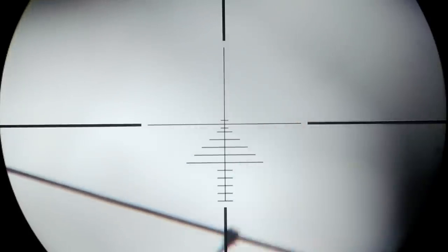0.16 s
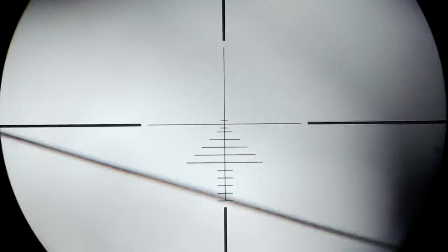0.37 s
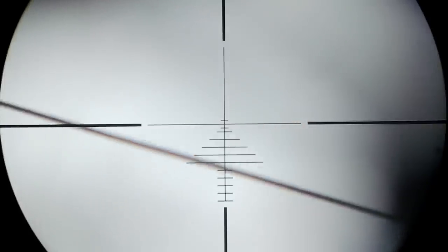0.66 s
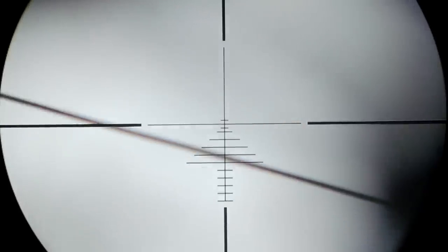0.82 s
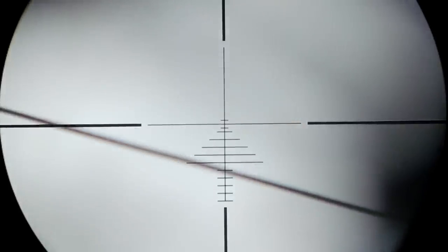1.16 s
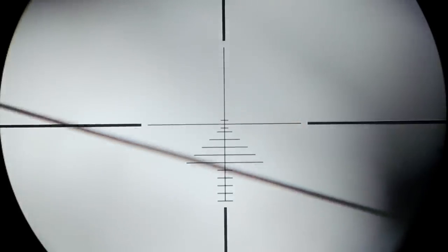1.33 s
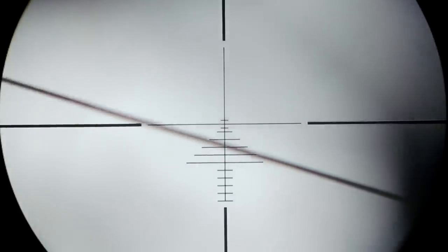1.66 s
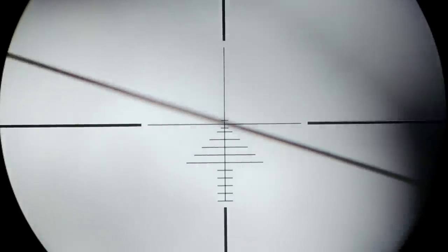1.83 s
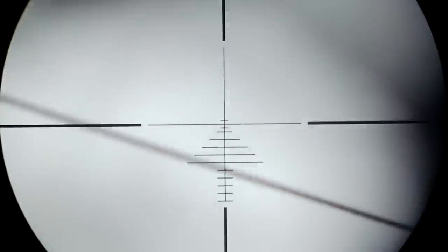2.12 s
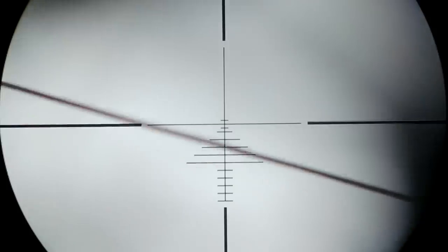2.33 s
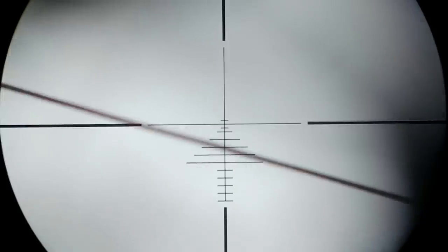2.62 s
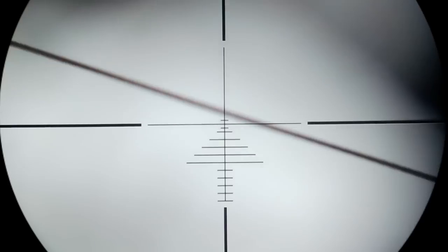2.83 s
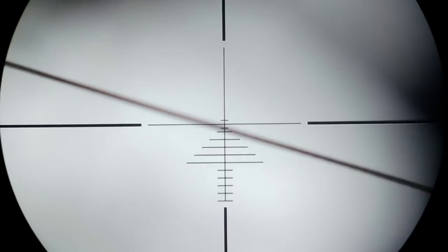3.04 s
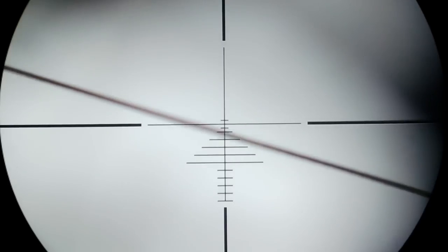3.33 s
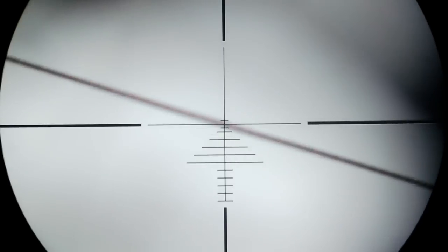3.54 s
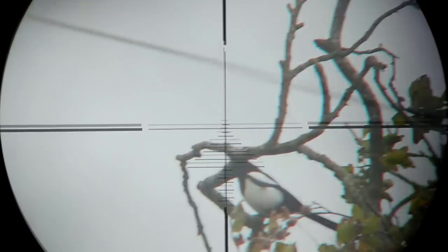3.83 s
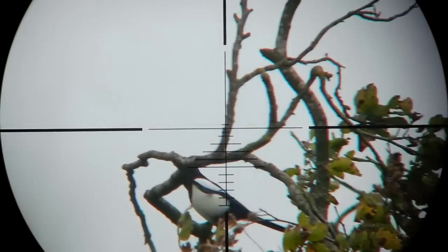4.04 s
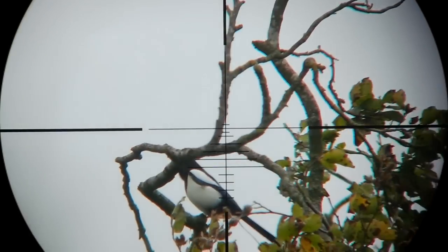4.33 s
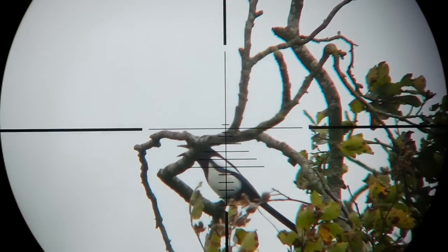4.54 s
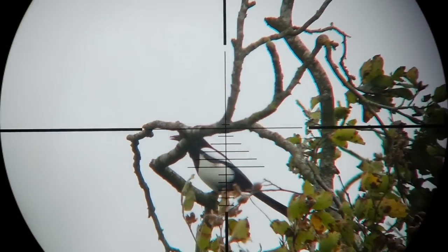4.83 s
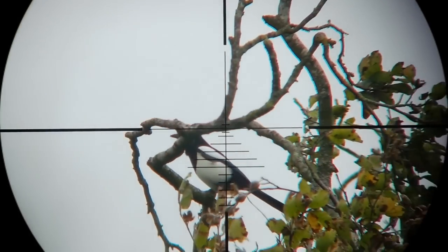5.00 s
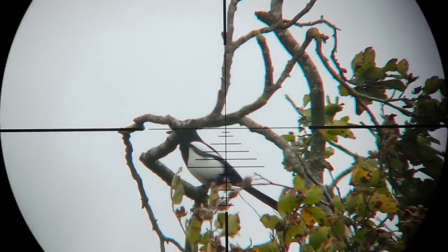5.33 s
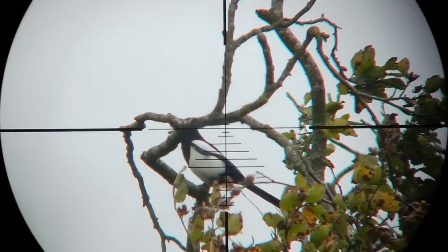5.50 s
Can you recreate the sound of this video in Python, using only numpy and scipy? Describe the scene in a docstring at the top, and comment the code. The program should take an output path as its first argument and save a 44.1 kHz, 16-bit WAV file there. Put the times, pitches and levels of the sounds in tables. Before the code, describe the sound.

An air rifle is handled right by the microphone in the open air. After a few soft ticks, the steel lever opens with a rapid cluster of sharp clacks, then shuts with another cluster ending in a hard snap, followed by one softer click. A low engine drone and faint traffic continue in the distance, and near the end come a very quiet magpie chatter and a few thin chirps.

```python
"""A side-lever air rifle is cocked outdoors, close to the microphone, while an engine drones far off.
At first the microphone is settling from a jolt and the barrel rings. Light touches slide on the steel
as traffic hiss swells and begins to fade. Near 2 s and 3 s the lever works in two bursts of clacks,
with a lighter one at 3.5 s: impact and friction excite the modes of steel, pins, barrel and hollow
stock. From about 4 s small birds chirp faintly and a magpie chatters in harsh throat pulses."""
import sys
import numpy as np
from scipy import signal
from scipy.fft import rfft, irfft
from scipy.io import wavfile

SR = 44100
rng = np.random.default_rng(int(sys.argv[2]) if len(sys.argv) > 2 else 0)


def output_pcm(signal):
    """Save a mono or channel-first signal as 16-bit PCM at the path in sys.argv[1].

    Samples are clipped to [-1, 1] before scaling.
    """
    pcm = np.clip(np.atleast_2d(signal).T, -1, 1) * 32767
    wavfile.write(sys.argv[1], SR, np.round(pcm).astype(np.int16))


N = 249606

# Impacts in the action. Each row: start in seconds, peaks of steel, stock and pins in dB, chatter time
# in ms, tilts of steel and stock in dB per octave. The tilts express where on the part the blow lands.
IMPACTS = [(0.203, -38.5, -44.5, -56, 2, 23, -5), (0.957, -51, -52, -60, 4.6, -4, -10),
           (1.126, -57.5, -54, -63, 3.9, -7, -1), (1.2656, -59, -68, -70, 5, -5.0, -3.0),
           (1.718, -73, -51, -75, 4, -13, 16), (1.8725, -73.5, -38, -72, 13, -2, -11.5),
           (1.9877, -40.5, -47.0, -43, 3, 1.5, -3.5), (2.0009, -19.5, -37, -27, 2.4, -1, 5),
           (2.0123, 6, -3, -9.5, 3.32, 2.5, 2.5), (2.0474, -22, -31, -42, 0.63, 1.5, -5.5),
           (2.0625, -8.5, -32.5, -37, 0.9, -2.5, 14), (2.0712, -11.5, -34.5, -36.5, 0.97, -1.5, -4),
           (2.0805, -16.5, -21.5, -29, 4.4, -1, -1), (2.088, -24.5, -24, -35.5, 5.6, -10, -3.5),
           (2.1078, -17, -19, -48, 6.6, -9.5, 0.5), (2.1191, -13, -44, -40, 3.2, 11.5, 4),
           (2.1327, -20, -36.5, -35, 7.9, 1, -1.5), (2.156, -0.5, -21, -14.5, 2.9, 6.5, -2.5),
           (2.1631, -6, -11, -8, 2.05, -3, 0.5), (2.1735, -17, -15.5, -17, 2.8, -3.5, 2.5),
           (2.199, -46, -23, -48, 8.6, -2.5, 0.5), (2.2338, -6.5, -18, -10, 4.9, -2, 6.5),
           (2.2532, -30, -33.5, -33, 3.0, 16, -1), (2.3058, -50.5, -36, -69, 4.4, -23, -13),
           (2.7742, -26, -41.5, -38, 2.7, 4, -9), (2.7815, -22.5, -32.5, -49.5, 0.65, 5, 1),
           (2.7891, -11.5, -22, -23.5, 2.3, -3.5, 5), (2.8246, -38, -38, -48.5, 1.1, 5, -3),
           (2.8336, -38.5, -33.5, -55, 4.3, -8, -5), (2.8429, -23, -17, -41.5, 6.2, -0.5, -1),
           (2.851, -0.5, -12.5, -13, 2.37, 6, -5), (2.8576, -6, -18.5, -16, 2.2, 12.5, 2.0),
           (2.8671, -8.5, -9, -22, 1.9, 6, 0.5), (2.8845, -6, -22.5, -21.5, 1.8, 0, 6.5),
           (2.895, -12, -20, -18, 3.1, 0.5, -4.5), (2.9, -3.5, -8.5, -16.5, 3.9, 6.5, 3.5),
           (2.914, -15, -20.5, -30.0, 1.6, 7, 0), (2.9335, -4, -20, -16, 1.7, 14.5, -2),
           (2.9467, -9, -9.5, -28, 2.4, 9.5, -1.5), (2.9531, -11, -15.5, -14.5, 0.8, 8.5, 1),
           (2.9675, 10.5, 0, -6, 3.6, 10.5, -2), (3.4372, -17.5, -27.5, -30.0, 3.1, 2, 11),
           (3.4439, -23, -24.5, -32, 3.4, -1, -1.5), (3.4923, -19, -31, -43, 0.92, -1, -11.5),
           (3.496, -12.0, -16, -39, 3.14, -6, 3.5), (3.6346, -74, -43.5, -76, 5.5, 4.0, -7.5),
           (3.6894, -53, -76, -69, 8.1, -5, -7.0), (3.9738, -59, -49, -63, 5.2, -8, -7),
           (4.2729, -60, -47, -59, 3.7, -10, -11)]
# Modes of the steel action. Each row: frequency in Hz, relative level in dB, t60 in seconds.
STEEL_MODES = [(2130, -12, 0.0072), (2956, -16, 0.0098), (3400, -9, 0.007), (3730, -10, 0.0058),
               (4150, -13, 0.0049), (4780, -11.5, 0.0091), (5050, -5, 0.0052), (5542, -3.5, 0.0084),
               (6220, -9, 0.0077), (6340, -7.5, 0.0055), (6880, -8, 0.0034)]
# Modes of the hollow stock. Each row: frequency in Hz, relative level in dB, t60 in seconds.
STOCK_MODES = [(145, -20, 0.026), (242, -21, 0.04), (531, -11.5, .04), (636, -9.5, .02), (878, -1.5, 0.04),
               (1020, -7, 0.022), (1094, -5.5, 0.022), (1686, -7, 0.012)]
# Treble modes of the small parts. Each row: frequency in Hz, relative level in dB, t60 in seconds.
PIN_MODES = [(7670, -4, 0.011), (8530, -2, 0.009), (9430, -2.5, 0.0039), (10800, -4.5, 0.0048),
             (11700, -7.5, 0.0011), (13100, -11.5, .005), (14895, -13.5, .005)]
# Long ring of barrel and air tube. Each row: frequency in Hz, relative level in dB, t60 in seconds.
BARREL_MODES = [(1058, -13, .4), (1765, -18, .12), (2290, -17, .15), (2562, -21, .11), (2920, -16, .12),
                (3316, -12, .12), (3456, -9, .1), (3615, -10, .14), (3781, -7, .15), (3909, -10, .09),
                (4340, -12, .12), (4793, -8, .08), (5023, -6, .3), (5060, -5, .1), (5193, -8, .1),
                (5360, -8, .14), (5426, -3, .1), (5490, -18, .55), (5510, -3, .1), (5704, -9, .1),
                (6355, -22, .25), (6605, -25, .1), (7290, -24, .15), (7845, -24, .25), (8600, -26, .18),
                (9550, -30, .25), (10400, -36, .25)]
# Lever and hand rubbing, and a brief hiss around the clack at 2.23 s.
# Each row: start and length in seconds, levels of steel, stock and pins in dB.
RUBS_AND_HISS = [(0.195, 0.025, -71, -63, -70), (1.7, 0.05, -75, -67, -85), (2.04, 0.02, -46, -42, -58),
                 (2.07, 0.08, -37.5, -42, -48.5), (2.14, 0.032, -42.5, -37.5, -43),
                 (2.19, 0.028, -43.5, -42, -57.5), (2.22, 0.039, -43.5, -44.5, -46),
                 (2.29, 0.045, -71, -48, -86), (2.81, 0.03, -57.5, -55.5, -64.5),
                 (2.855, 0.06, -34.5, -27.5, -43), (2.925, 0.035, -43.5, -31.5, -48),
                 (2.975, 0.018, -42.5, -40, -43.5), (3.465, 0.025, -52, -53.5, -58),
                 (3.64, 0.04, -71.5, -59.5, -95), (3.69, 0.09, -75, -78, -80)]
# Rattle of steel, stock and pins, in that order. Each row: level offset in dB, t60 in seconds.
RATTLE_DECAYS = [(-34, 0.089), (-23.5, 0.078), (-30, .055)]
# Light sliding touches on the steel. Each row: start in seconds, length in seconds, level in dB.
STEEL_TOUCHES = [(0.1, 0.055, -63), (0.195, 0.012, -51.5), (1.31, 0.14, -78), (3.61, 0.039, -76),
                 (3.66, 0.14, -77)]
# Level of the low drone as heard, dipping briefly near 3.9 s where the background drops.
# Each row: time in seconds, level in dB.
DRONE_LEVELS = [(0, -44.5), (3.6, -45.5), (3.9, -50), (4.1, -47.5), (5.66, -46)]
# Partials of the engine. Each row: multiple of the firing rate, relative level in dB.
ENGINE_ORDERS = [(.5, -3), (1, 1.5), (1.5, -20)]
# Traffic hiss as heard. Each row: time in seconds, level in dB, gain of the added treble in dB.
TRAFFIC_COURSE = [(0, -61.5, -40), (.4, -61, -11), (.8, -58.5, -12), (1.1, -61, -2.5), (1.45, -59.5, 5),
                  (1.9, -62, -2.5), (2.6, -63.5, -9), (3.6, -66, -12), (3.85, -70, -13), (5.66, -71, -23)]
# Spectrum of tyre roar. Each row: frequency in Hz, relative spectral density in dB.
TYRE_SPECTRUM = [(180, -46.5), (300, -26), (406, 4), (533, -4), (587, 2.5), (722, -4), (770, -1),
                 (1140, -3), (1320, -12), (1460, -5.5), (1630, -11.5), (2350, -22.5), (4000, -41.5),
                 (5200, -60.5), (8800, -120)]
# Notes of the magpie. Each row: start in seconds, level in dB.
MAGPIE_NOTES = [(4.105, -71), (4.15, -63.5), (4.213, -66), (4.286, -64.5), (4.366, -66), (4.441, -65.5),
                (4.524, -64), (4.611, -61), (4.71, -62.5)]
# Resonances of its voice. Each row: frequency in Hz, nominal bandwidth in Hz, relative level in dB.
MAGPIE_FORMANTS = [(1847, 150, 2.5), (2424, 610, 5), (2768, 490, 5), (4940, 770, 1), (5970, 580, -5)]
# Chirps of far birds. Each row: start in seconds, level in dB, length in seconds.
BIRD_CHIRPS = [(3.958, -77, .17), (4.82, -77.5, .13), (5.415, -77.5, .18)]
# Spectrum of the open air. Each row: frequency in Hz, relative spectral density in dB.
AIR_SPECTRUM = [(12, -30.5), (20, -8.5), (34, -15), (55, -15.5), (106, -20), (140, -36.5), (180, -37),
                (416, -41.5), (505, -49), (811, -48), (1380, -57.5), (4000, -63), (8400, -66.5),
                (11500, -71), (15300, -70), (16200, -89)]


def rifle():
    """Superposition: steel, pins, stock and barrel answer the same impacts and rubbing."""
    starts, steel_db, stock_db, pins_db, _, steel_tilt, stock_tilt = np.transpose(IMPACTS)
    rattles = [rattle(starts, db, *decay)
               for db, decay in zip((steel_db, stock_db, pins_db), RATTLE_DECAYS)]
    steel_rub, stock_rub, pins_rub = swells(RUBS_AND_HISS, rise_s=0.004, fade_s=0.0065) + rattles
    touch, = swells(STEEL_TOUCHES, rise_s=0.018, fade_s=0.012)
    steel = struck_part(STEEL_MODES, [1800, 7500], steel_db, steel_rub, steel_tilt,
                        spread_db=3.5, rise_ms=0.27, impulse_db=12)
    pins = struck_part(PIN_MODES, [7000, 16500], pins_db, pins_rub, np.zeros(len(starts)),
                       spread_db=1.5, rise_ms=0.22, impulse_db=6)
    stock = struck_part(STOCK_MODES, [90, 2200], stock_db, stock_rub, stock_tilt,
                        spread_db=4, rise_ms=1.5, impulse_db=12.5)
    return steel + pins + stock + barrel(starts, steel_db, steel_rub, touch) + sliding_touch(touch)


def struck_part(modes, band_hz, peak_db, rub_gain, tilt_db, spread_db, rise_ms, impulse_db):
    """Modal excitation: each impact is an impulse with a short chatter; friction drives the modes too."""
    impacts, t = np.array(IMPACTS), np.arange(SR // 12) / SR
    chatter_s = np.clip(impacts[:, 4:5], 0.2, 9) / 1000
    envelope = np.exp(-(t / chatter_s) ** 1.2) * (1 - np.exp(-1000 * t / rise_ms))
    force = envelope * rng.standard_normal((len(impacts), len(t)))
    force[:, round(rise_ms * SR / 1000)] += amp(impulse_db)
    octaves = np.log2(np.minimum(np.array(modes)[:, 0], 5000) / band_hz[0])   # tilt ends at 5 kHz
    scatter_db = spread_db * rng.standard_normal((len(impacts), len(modes)))
    strengths = amp(scatter_db + np.outer(tilt_db, octaves))
    radiation = signal.butter(2, band_hz, "band", fs=SR, output="sos")   # little radiates outside it
    blows = signal.sosfilt(radiation, body(force, modes, strengths))
    blows *= amp(peak_db)[:, None] / np.abs(blows).max(axis=1, keepdims=True)
    positions = (impacts[:, :1] * SR).astype(int) + np.arange(len(t))
    clacks = np.bincount(positions.ravel(), blows.ravel(), N)[:N]
    friction = amp(2.2 * drift(120)) * grit(4000, uneven_db=3)
    return clacks + rub_gain * rms_one(signal.sosfilt(radiation, body(friction, modes)))


def barrel(starts, steel_db, steel_rub, touch):
    """Mechanical coupling: blows, rubbing and touches shake the lightly damped barrel."""
    force = impulses(starts, steel_db - 52)
    buzz = amp(-69 - 60 * np.arange(N) / SR / 0.21)   # a loose part buzzes at the start, t60 0.21 s
    force += (amp(-42) * steel_rub + amp(-36.5) * touch + buzz) * grit(3000, uneven_db=4)
    force[0] += amp(-42.5)   # the barrel rings from the outset
    return body(force, BARREL_MODES)


def sliding_touch(gain):
    """Selective resonance: light friction sounds only three strong steel modes near 5 kHz."""
    modes = STEEL_MODES[5:8]
    friction = grit(2500, uneven_db=4.5)
    return gain * rms_one(body(body(friction, modes), modes))


def rattle(starts, blow_db, offset_db, t60):
    """Exponential decay: the gain of loose parts rattling on after each blow."""
    kicks = impulses(starts, 0.75 * blow_db + offset_db)
    return signal.lfilter([1], [1, -amp(-60 / (t60 * SR))], kicks + 1e-18)


def swells(rows, rise_s, fade_s):
    """Amplitude envelopes: gains that swell, hold and die away, one per level column."""
    t, gains = np.arange(N) / SR, 0
    for start, length, *db in rows:
        before, after = np.maximum(start - t, 0), np.maximum(t - start - length, 0)
        gains = gains + np.outer(amp(db), np.exp(-(before / rise_s) ** 2 - after / fade_s))
    return gains


def engine(firing_hz=93.2):
    """Periodic firing: a tone at the firing rate, flanked by wavering half orders."""
    level_db, = in_time(DRONE_LEVELS)
    cycles = np.cumsum(firing_hz * (1 + 0.006 * drift(7.2))) / SR
    tones = [amp(db + waver_db * drift(20)) * np.sin(2 * np.pi * (order * cycles + rng.random()))
             for (order, db), waver_db in zip(ENGINE_ORDERS, (3, 0.8, 3))]
    return np.sqrt(2) * amp(level_db) * sum(tones)


def traffic():
    """Line-of-sight propagation: tyre roar is brighter while the car is in view."""
    level_db, treble_db = in_time(TRAFFIC_COURSE)
    roar = coloured(TYRE_SPECTRUM)
    treble = signal.sosfilt(signal.butter(2, 900, "high", fs=SR, output="sos"), roar)
    return amp(level_db + drift(2.2)) * (roar + amp(treble_db) * treble)


def magpie(pulse_hz=330, note_s=0.06):
    """Source and filter: uneven throat pulses pass through five resonances as harsh notes."""
    notes = sum(amp(db) * arch(start, note_s) ** 1.1 for start, db in MAGPIE_NOTES)
    cycles = np.cumsum(pulse_hz * (1 + 0.22 * drift(67))) / SR
    pulses = np.diff(np.floor(cycles), prepend=0)
    rasp = rms_one(pulses) + 0.75 * grit(1100, uneven_db=2)
    voice = 0
    for hz, width, db in MAGPIE_FORMANTS:
        formant = ring(ring(rasp, hz, 2.05 / width), hz, 2.1 / width)   # twice, for deep valleys
        voice += amp(db + 2.6 * drift(35)) * rms_one(formant)
    return notes * rms_one(voice)


def far_birds(hz=3560, t60=0.0035):
    """Narrow-band noise: chirps blurred by distance flutter about one pitch."""
    notes = sum(amp(db) * arch(start, length) for start, db, length in BIRD_CHIRPS)
    band = ring(ring(grit(900, uneven_db=-10), hz, t60), hz, t60)
    return notes * rms_one(band)


def open_air():
    """Ambient noise: a broad floor, strongest in the deep bass, wavering slightly in level."""
    return amp(-48 + 0.74 * drift(7.5)) * coloured(AIR_SPECTRUM)


def body(force, modes, strengths=None):
    """Modal sum: one force drives all modes, in alternating sign; strengths are per blow and mode."""
    motion = 0
    for k, (hz, db, t60) in enumerate(modes):
        strength = 1 if strengths is None else strengths[:, k:k + 1]
        motion += (-1) ** k * amp(db) * strength * ring(force, hz, t60)
    return motion


def ring(force, hz, t60):
    """Damped oscillator: a unit impulse starts a sine that falls 60 dB in t60 seconds."""
    radius, angle = amp(-60 / (t60 * SR)), 2 * np.pi * hz / SR
    return signal.lfilter([0, np.sin(angle)], [1, -2 * radius * np.cos(angle), radius ** 2], force + 1e-18)


def grit(per_s, uneven_db):
    """Shot noise: dense uneven impulses, like the micro-slips of friction, at rms 1."""
    sizes = amp(uneven_db * np.minimum(rng.exponential(1, N), 4)) * rng.choice([-1, 1], N)
    return rms_one(sizes * (rng.random(N) < per_s / SR))


def coloured(spectrum):
    """Spectral shaping: steady noise with the given spectrum, at rms 1."""
    hz, db = np.transpose(spectrum)
    bins_hz = np.arange(1, N // 2 + 2) * SR / N
    gain = amp(np.interp(np.log(bins_hz), np.log(hz), db))
    return rms_one(irfft(rfft(rng.standard_normal(N)) * gain, N))


def impulses(starts, db):
    """Ideal impacts: one single-sample pulse at each start."""
    return np.bincount((starts * SR).astype(int), amp(db), N)


def arch(start, length):
    """Half-sine envelope of one note."""
    return np.sin(np.pi * np.clip((np.arange(N) / SR - start) / length, 0, 1))


def drift(per_s):
    """Random modulation: straight lines between Gaussian values of spread 1."""
    knots = rng.standard_normal(int(N / SR * per_s) + 2)
    return np.interp(np.arange(N) / SR * per_s, np.arange(len(knots)), knots)


def in_time(rows):
    """Linear interpolation of each column of a timed table, sample by sample."""
    times, *columns = np.transpose(rows)
    return [np.interp(np.arange(N) / SR, times, column) for column in columns]


def amp(db):
    """Amplitude ratio from decibels."""
    return 10 ** (np.asarray(db) / 20)


def rms_one(x):
    """Normalisation to rms 1."""
    return x / np.sqrt(np.mean(x ** 2) + 1e-20)


def scene():
    """Superposition: the close rifle and the distant sources add in one channel."""
    return (open_air() + rifle() + engine() + magpie() + far_birds() + traffic())[None]


def record(dry):
    """Overload clips the loudest clacks, a low-pass cuts the top, and the offset relaxes after a jolt."""
    offset, jolt, settle_s, cutoff_hz = 0.031, -0.21, 0.071, 17300
    baseline = offset + jolt * np.exp(-np.arange(N) / SR / settle_s)
    lowpass = signal.cheby2(8, 40, cutoff_hz, fs=SR, output="sos")
    return signal.sosfilt(lowpass, np.clip(dry, -1, 1)) + baseline


dry = scene()
out = record(dry)
output_pcm(out)
```